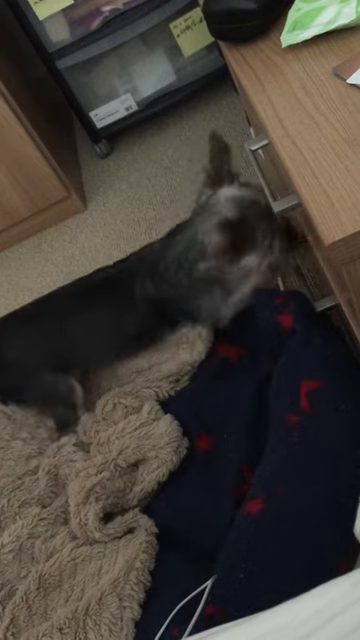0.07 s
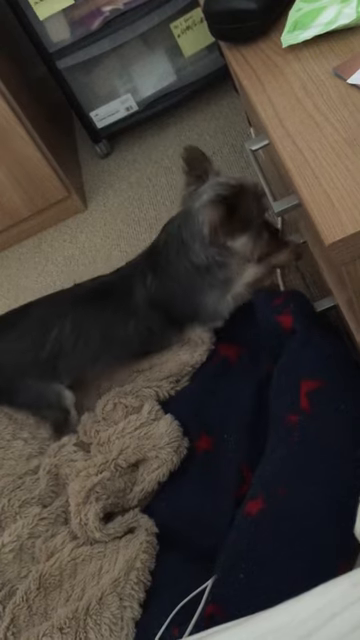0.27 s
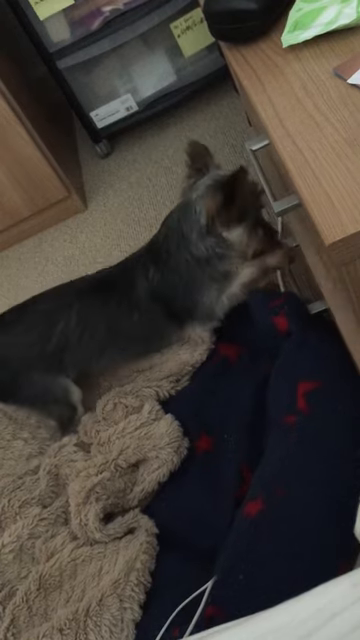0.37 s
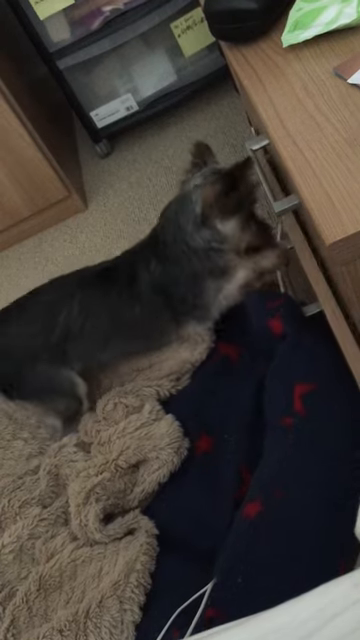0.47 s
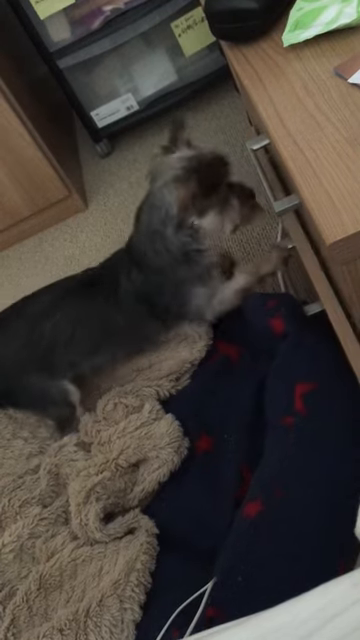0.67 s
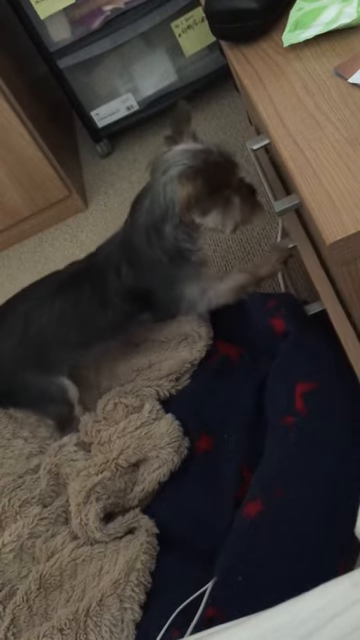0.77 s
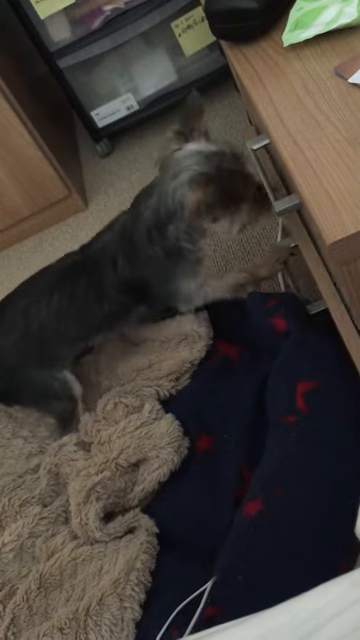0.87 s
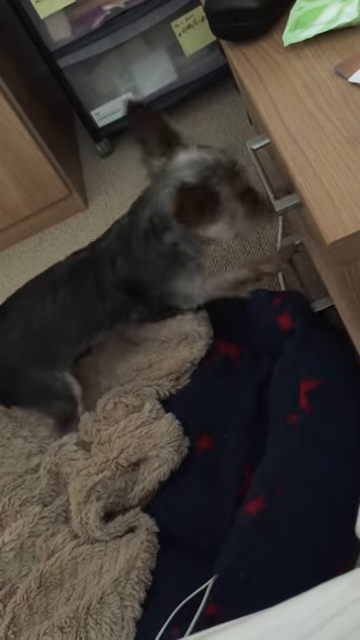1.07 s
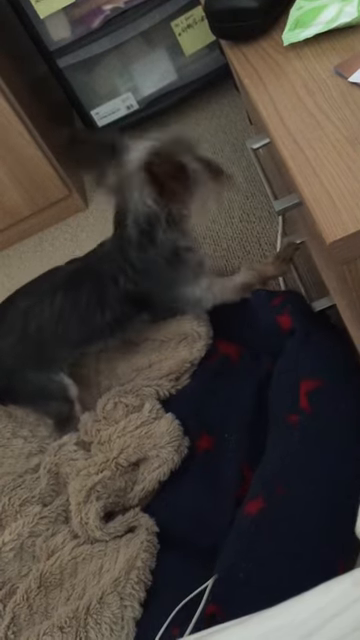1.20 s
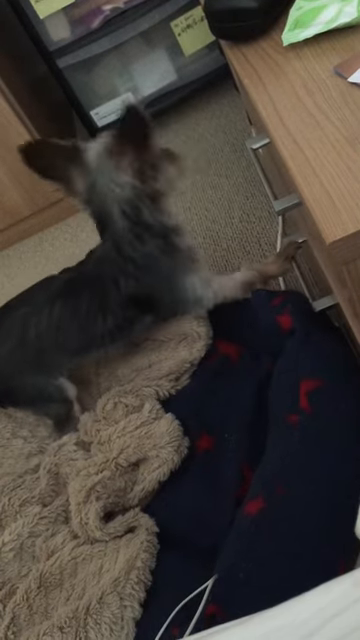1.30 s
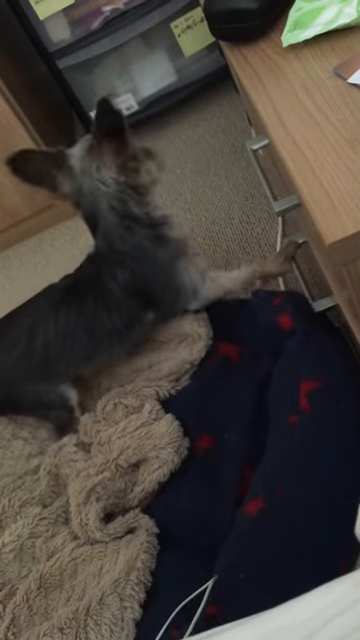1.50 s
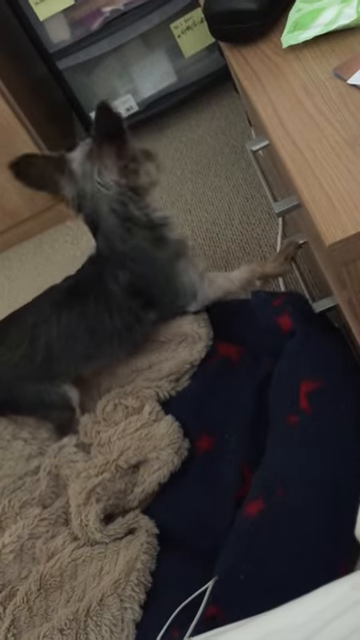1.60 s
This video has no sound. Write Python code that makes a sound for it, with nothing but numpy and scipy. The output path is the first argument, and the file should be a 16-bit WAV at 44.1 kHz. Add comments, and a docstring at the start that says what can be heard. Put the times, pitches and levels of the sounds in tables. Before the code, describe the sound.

A small dog paws at a wooden drawer in a quiet room. At 0.1 seconds the front knocks and squeaks faintly; at 0.2 the drawer bumps hollowly and its contents rattle. It rolls with a low, gritty rumble. From about 0.95 to 1.2 seconds claws tick and scrape, with sharp wooden knocks, then a faint metal handle clink. Soft jolts and a small tick follow around 1.5 seconds.

```python
"""A small dog paws at a wooden drawer unit in a quiet carpeted room.
Over a low rumble a paw lands: the loose front knocks and squeaks, then the drawer bumps its stop
with a hollow boom and its contents rattle. It rolls out on gritty runners. From about one second
claws tick and scrape over the front, the panel knocks again and the metal handle clinks.
The drawer rumbles on a little, with a roller's tick and a few soft jolts."""
import sys
import numpy as np
from scipy import signal
from scipy.fft import rfft, irfft, next_fast_len
from scipy.io import wavfile

SR = 44100
rng = np.random.default_rng(int(sys.argv[2]) if len(sys.argv) > 2 else 0)


def int16_out(signal):
    """Quantize to a 16-bit WAV file."""
    q = np.round(np.clip(np.atleast_2d(signal).T, -1, 1) * 32767)
    wavfile.write(sys.argv[1], SR, q.astype(np.int16))


N = 72765
TIME = np.arange(N) / SR


def from_db(db):
    return 10 ** (np.asarray(db) / 20)


def stroke(curve):
    """Gain of one movement from (s, dB) points: silent before the first and after the last."""
    return from_db(np.interp(TIME, *np.transpose(curve), left=-np.inf, right=-np.inf))


def unit(x):
    """Scale to energy 1."""
    return x / np.sqrt(np.sum(x ** 2) + 1e-20)


def add(out, s, sound):
    """Mix a sound in at s seconds."""
    start = int(s * SR)
    out[start:start + len(sound)] += sound[:N - start]


def coloured(x, points):
    """Causal (minimum-phase) EQ through (Hz, dB) points."""
    size = 2 * next_fast_len(len(x))
    hz, db = np.transpose(points)
    grid_hz = np.maximum(np.arange(size // 2 + 1) * SR / size, 1)
    gain = from_db(np.interp(np.log(grid_hz), np.log(hz), db))
    cepstrum = irfft(np.log(gain))
    cepstrum[1:size // 2] *= 2
    cepstrum[size // 2 + 1:] = 0
    return irfft(rfft(x, size) * np.exp(rfft(cepstrum)))[:len(x)]


def peaked(x, hz, db, octaves):
    """One resonance, set by the spot that is struck."""
    return coloured(x, [(hz / 2 ** octaves, 0), (hz, db), (hz * 2 ** octaves, 0)])


def passed(x, hz, kind):
    """Second-order low- or high-pass."""
    return signal.sosfilt(signal.butter(2, hz, kind, fs=SR, output="sos"), x)


def ring(modes, t=TIME):
    """A struck body's decaying sines from (Hz, dB, t60 s) rows, neighbours in opposite polarity."""
    return sum((-1) ** k * from_db(db - 60 * t / t60) * np.sin(2 * np.pi * hz * t)
               for k, (hz, db, t60) in enumerate(modes))


def panel_ring(size=N // 5, spread_db=2.0):
    """The drawer front rings, struck a little differently each time."""
    # The panel's modes. Each row: pitch in Hz, level in dB, t60 in seconds.
    modes = [(238.5, -8, 0.099), (367, -6.5, 0.17), (449, -14.5, .16), (703.7, -8.5, 0.2), (847, -15, 0.18),
             (1029.6, -3.5, 0.11), (1179, -20.5, 0.34), (1500, -18, 0.24), (1590, -4.5, 0.1),
             (1780, -15, 0.13), (2090, -16, 0.14), (2340, -8, 0.095), (2650, -15.5, 0.14),
             (3015, -9.5, 0.062), (3214, -10, 0.056), (3620, -10.5, 0.047)]
    return ring([(hz, db + rng.normal(0, spread_db), t60) for hz, db, t60 in modes], TIME[:size])


def contact(crack_t60, crack_db):
    """A sharp click and a short crack of dense resonances; energy 1."""
    t = TIME[:N // 5]
    out = from_db(crack_db) * unit(rng.standard_normal(len(t)) * from_db(-60 * t / crack_t60))
    out[0] = 1
    return unit(out)


def reflections(t60):
    """Dense reflections that build up quickly and die away; energy 1."""
    t = TIME[:N // 5]
    build_up = 1 - np.exp(-t / 0.00066)
    return unit(rng.standard_normal(len(t)) * from_db(-60 * t / t60) * build_up)


def noise(colour):
    """Smooth noise of rms 1."""
    return unit(coloured(rng.standard_normal(N), colour)) * np.sqrt(N)


def grit(colour, per_s, spread_db):
    """Dense tiny slips of uneven size; rms 1."""
    slips = (rng.random(N) < per_s / SR) * rng.choice([-1, 1], N)
    sizes = from_db(spread_db * np.minimum(rng.exponential(1, N), 4))
    return unit(coloured(slips * sizes, colour)) * np.sqrt(N)


def room_tone():
    """A faint bed of hiss and rumble, its level set above the bass."""
    # The bed's EQ. Each row: frequency in Hz, gain in dB.
    colour = [(15, -45), (25, -24), (37, -38), (101, -11), (202, -21.5), (621, -26.5), (1500, -28),
              (15000, -39.5)]
    air = noise(colour)
    return from_db(-74) * air / np.std(passed(air, 255, "high"))


def drawer_rumble():
    """The rolling drawer gives a low rumble that swells and sinks."""
    # The rumble's fader. Each row: time in seconds, level in dB.
    fader = [(0, -58.5), (.05, -69), (.33, -53.5), (.4, -70.5), (.47, -61), (.56, -65), (.7, -65.5),
             (.75, -55.5), (.9, -62), (1.1, -64), (1.25, -53), (1.34, -62), (1.42, -69.5), (1.5, -56.5),
             (1.65, -60)]
    # Its bass-heavy EQ. Each row: frequency in Hz, gain in dB.
    colour = [(25, -47), (45, 3), (70, -4), (98, 1), (130, -9), (190, -10.5), (280, -18), (420, -31),
              (700, -58.5)]
    return from_db(np.interp(TIME, *np.transpose(fader))) * noise(colour)


def squeaks(waver_hz=152):
    """Parts stick and slip: each squeak swells and fades on a wavering pitch."""
    # Each row: start in seconds, length in seconds, pitch in Hz, level in dB.
    chirps = [(.087, 0.025, 3000, -56), (0.178, 0.044, 3600, -60), (.188, 0.038, 4000, -60),
              (.078, 0.01, 1280, -52)]
    out = np.zeros(N)
    for s, length, hz, db in chirps:
        waver = passed(rng.standard_normal(N), 280, "low")
        pitch = hz + waver_hz * waver / waver.std()
        swell = np.sin(np.pi * np.minimum(TIME / length, 1))
        add(out, s, from_db(db) * swell * np.sin(2 * np.pi * np.cumsum(pitch) / SR))
    return out


def paw_pad(start_s=.079, hz=147, db=-49, t60=0.11):
    """The soft pad lands on the drawer with one low thud."""
    out = np.zeros(N)
    add(out, start_s, ring([(hz, db, t60)]))
    return out


def panel_knocks(room_db=-6.5):
    """The loose front knocks in its frame: a woody crack, a short room tail and ringing modes."""
    # Each row: start in seconds, then level, bass, treble and ring in dB, resonance in Hz.
    knocks = [(0.079, -27, -14.5, -6, -27.5, 1250), (0.0854, -25, -8.5, -1.5, -26, 2920),
              (.094, -21, -16, -1, -40.5, 2970), (1.118, -9, -5.5, -3, -37.5, 2250),
              (1.124, -11, -8, 4, -40, 1850), (1.1338, -10.5, 0, 4, -28.5, 3620),
              (1.1382, -10, 1, -3.5, -49, 2250), (1.1425, -22.5, 2, 4, -41, 1410),
              (1.1796, -11.5, 4.5, 13.5, -37, 3300), (1.187, -18.5, 6, 11.5, -35, 1610)]
    # The wood's tone. Each row: frequency in Hz, gain in dB.
    colour = [(60, -6), (150, 4), (380, -1), (560, 1.5), (860, -3), (1100, -4.5), (2200, -1), (2800, -6.5),
              (3700, -3), (5200, -16.5), (9000, -22), (15000, -22.5)]
    out = np.zeros(N)
    for s, db, bass_db, treble_db, ring_db, hz in knocks:
        crack = contact(crack_t60=0.044, crack_db=8.5) + from_db(room_db) * reflections(t60=0.26)
        knock = peaked(coloured(crack, colour), hz, db=10, octaves=0.13)
        knock += from_db(ring_db) * panel_ring()
        shelves = [(350, bass_db), (800, 0.0038), (3200, 0.012), (8000, treble_db)]
        add(out, s, from_db(db) * coloured(knock, shelves))
    return out


def claw_ticks(tail_db=-4, ring_db=-38, edge_s=0.96):
    """Hard claw tips catch on the drawer, each spot with its own pitch."""
    # Each row: start in seconds, level in dB, treble in dB, resonance in Hz, its height in dB.
    ticks = [(.0795, -26, -2, 6940, 11.5), (0.855, -36, 12, 11900, 15), (0.953, -7, -13, 2950, 5.5),
             (.957, -17.5, -5, 2100, 9), (0.9712, -19.5, 3, 3800, 6), (0.9804, -14.5, -4, 2500, 5),
             (1.0253, -20.5, -15, 2230, 12), (1.0286, -17.5, 4, 3600, 9), (1.0444, -11, -5, 2810, 9.5),
             (1.0557, -12.5, -11, 4040, 9.5), (1.0595, -20, 15.5, 4240, 9), (1.0643, -16, 7, 704, 22),
             (1.0742, -4.5, 3, 3660, 2), (1.178, -17.5, 6, 2280, 8.5), (1.2068, -31, 28.5, 12900, 4.5)]
    # The ticks' bright EQ. Each row: frequency in Hz, gain in dB.
    colour = [(200, -29.5), (750, -32), (1030, -11.5), (1400, -20.5), (1900, -5), (2500, -6.5),
              (3600, -5.5), (5200, -11), (8000, -12.5), (11000, -18), (15000, -23)]
    # The drawer's edge, rung by the first firm strike. Each row: pitch in Hz, level in dB, t60 in seconds.
    edge_modes = [(1017, -52.5, 0.08), (1770, -51, 0.067), (2070, -49.5, .06)]
    out = np.zeros(N)
    for s, db, treble_db, hz, peak_db in ticks:
        click = coloured(contact(crack_t60=.014, crack_db=0), [(4000, 0), (12000, treble_db)])
        tail = from_db(tail_db) * reflections(t60=0.14) + from_db(ring_db) * panel_ring()
        tick = coloured(click + tail, colour)
        add(out, s, from_db(db) * peaked(tick, hz, peak_db, octaves=.45))
    add(out, edge_s, ring(edge_modes))
    return out


def drawer_stop(stop_s=.1975, rattle_s=.205, rattle_t60=0.48):
    """The drawer hits its stop: it clacks, rings the front and shakes the contents."""
    # The tone of clack and rattle. Each row: frequency in Hz, gain in dB.
    colour = [(200, 2.5), (360, 8), (550, 1), (870, -6.5), (1100, 1.5), (1600, -5), (2000, -16.5),
              (3400, -6.5), (5000, -13.5), (9000, -16.5), (15000, -21)]
    out = np.zeros(N)
    add(out, stop_s, from_db(-12.5) * coloured(reflections(t60=0.13), colour))
    add(out, stop_s, from_db(-49) * passed(panel_ring(), 810, "low"))
    rattle = grit(colour, per_s=2700, spread_db=2.5)
    add(out, rattle_s, from_db(-56.5 - 60 * TIME / rattle_t60) * rattle)
    return out


def cabinet_booms():
    """Bumps and jolts set the hollow cabinet booming; softer contacts sound duller."""
    # Each row: start in seconds, level in dB, contact cut-off in Hz.
    bumps = [(0.2006, -17.5, 506), (0.2412, -25.5, 504), (0.3187, -41.5, 178), (0.343, -42, 174),
             (0.7199, -34.5, 91), (0.7521, -30, 91.5), (0.7934, -39, 500), (0.863, -24, 47),
             (0.9692, -31.5, 51.3), (1.0531, -38.5, 179), (1.123, -37.5, 497), (1.1503, -39.5, 178),
             (1.178, -37.5, 470), (1.237, -42, 182), (1.4543, -26, 47.7), (1.4782, -32.5, 49.3),
             (1.548, -35.5, 48.5), (1.598, -33, 48)]
    # The cabinet's modes. Each row: pitch in Hz, level in dB, t60 in seconds.
    modes = [(68.4, -21, 0.31), (96.4, 0, 0.15), (103.13, 0, 0.11), (138.8, -5, 0.15), (136.2, -0.5, .11),
             (169.6, -6, 0.074), (180.2, -23, 0.355), (258, -34.5, 0.25)]
    out, boom = np.zeros(N), ring(modes)
    for s, db, cut_hz in bumps:
        add(out, s, from_db(db) * passed(boom, cut_hz, "low"))
    return out


def runners(ring_db=-6, notch_s=1.444):
    """The runners catch in small slips that ring the wood, and a roller ticks over a notch."""
    # The rub's fader. Each row: time in seconds, level in dB.
    fader = [(.25, -72), (.295, -67), (.35, -78.5), (.45, -74.5), (.55, -94), (.69, -90), (.74, -66.5),
             (.82, -62.5), (.86, -65), (.92, -76), (1.3, -77.5), (1.38, -94), (1.438, -80), (1.455, -64.5),
             (1.5, -83)]
    # Its EQ. Each row: frequency in Hz, gain in dB.
    colour = [(150, 9), (420, 4.5), (560, -3.5), (1150, -0.5), (1900, -0.5), (2700, -9), (4000, -19.5),
              (12000, -31)]
    slips = grit(colour, per_s=700, spread_db=1.6)
    wood = signal.fftconvolve(slips, unit(panel_ring()))[:N]
    out = stroke(fader) * (slips + from_db(ring_db) * wood / wood.std())
    add(out, notch_s, ring([(1660, -57, .035)]))
    return out


def claw_scrape():
    """Between catches the claws drag over the wood with a fine grain."""
    # The drag's fader. Each row: time in seconds, level in dB.
    fader = [(.95, -62), (.965, -61.5), (.99, -65), (1.02, -77), (1.05, -65), (1.068, -53), (1.1, -58.5),
             (1.125, -57.5), (1.165, -71), (1.185, -68), (1.218, -57.5), (1.26, -77), (1.3, -90)]
    # Its EQ. Each row: frequency in Hz, gain in dB.
    colour = [(200, 3.5), (700, 7), (1500, 9), (3500, -5.5), (5500, 1.5), (9000, -4), (15000, -8)]
    return stroke(fader) * grit(colour, per_s=3000, spread_db=3.5)


def handle_clinks(attack_s=0.0023, free_s=.03, damping_db_per_s=300):
    """The metal handle drops back, clinks, lands again with a duller blow and is damped at rest."""
    # Each row: start in seconds, level in dB, contact cut-off in Hz.
    clinks = [(1.207, -54, 9000), (1.2215, -42.5, 2070)]
    # The metal's modes. Each row: pitch in Hz, level in dB, t60 in seconds.
    modes = [(1059, 4, 0.073), (1182, -5, 0.11), (1980, -8.5, 0.16), (4110, -7.5, 0.14),
             (4160, 12.5, 0.028)]
    metal = ring(modes) * (1 - np.exp(-TIME / attack_s))
    metal *= from_db(-damping_db_per_s * np.maximum(TIME - free_s, 0))
    out = np.zeros(N)
    for s, db, cut_hz in clinks:
        add(out, s, from_db(db) * passed(metal, cut_hz, "low"))
    return out


def scene():
    """All layers in one mono mix."""
    return (room_tone() + drawer_rumble() + squeaks() + paw_pad() + panel_knocks() + claw_ticks()
            + drawer_stop() + cabinet_booms() + runners() + claw_scrape() + handle_clinks())[None]


def record(dry):
    """The top is cut steeply above 15.5 kHz."""
    return signal.sosfilt(signal.ellip(10, .2, 70, 15500, fs=SR, output="sos"), dry)


dry = scene()
out = record(dry)
int16_out(out)
```